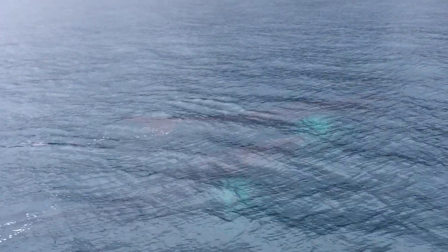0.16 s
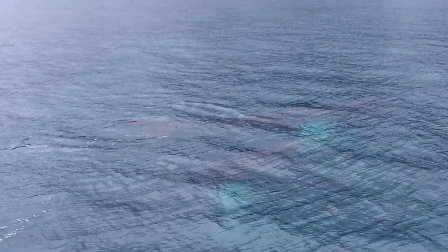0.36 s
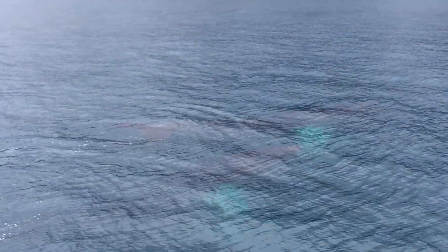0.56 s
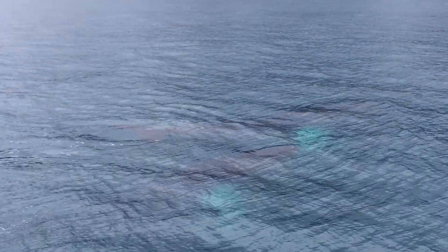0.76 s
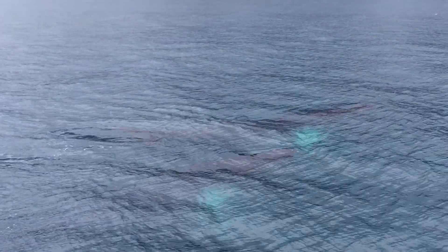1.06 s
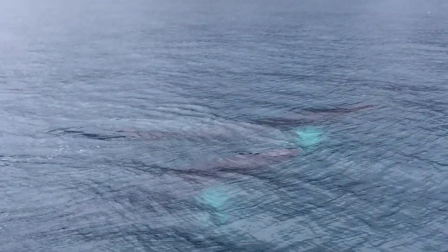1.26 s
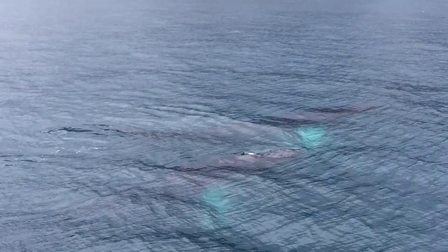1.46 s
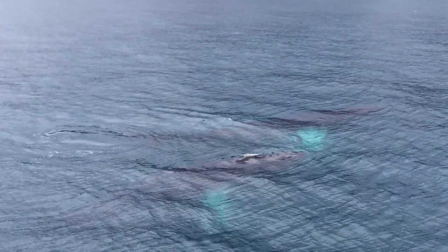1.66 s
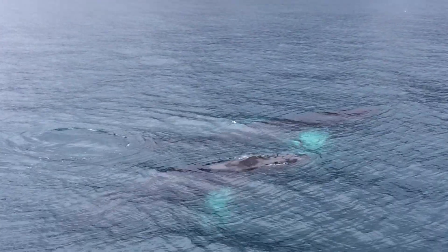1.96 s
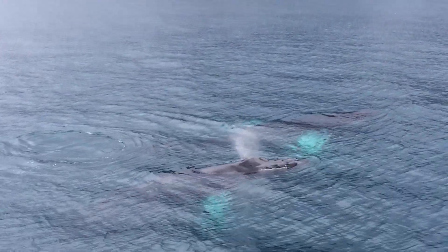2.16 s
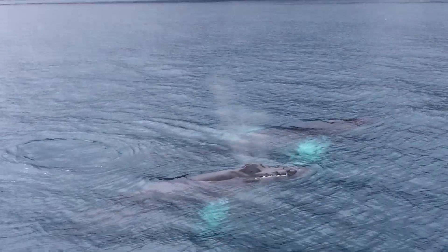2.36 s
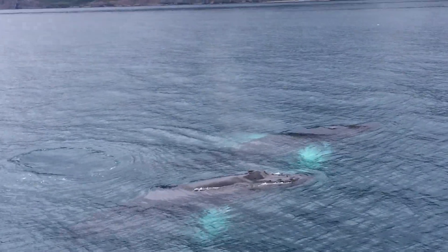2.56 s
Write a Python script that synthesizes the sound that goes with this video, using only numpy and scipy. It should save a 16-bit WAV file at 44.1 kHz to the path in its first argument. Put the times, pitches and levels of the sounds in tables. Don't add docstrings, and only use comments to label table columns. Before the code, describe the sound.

On open sea from a boat deck, low engine rumble, wind thumps and dull water slaps come first, then a whale's sharp rushing exhale, noisy and hollow, fades with small gurgles into the hum.

```python
import sys
import numpy as np
from scipy import signal
from scipy.io import wavfile
from scipy.ndimage import uniform_filter1d

SR = 44100
rng = np.random.default_rng(int(sys.argv[2]) if len(sys.argv) > 2 else 0)


def voltage_ratio(decibels):
    exponent = np.asarray(decibels, float) / 20
    return 10 ** exponent


def log_audio(samples):
    frames = np.atleast_2d(samples).T
    limited = np.clip(frames, -1, 1)
    pcm = np.round(limited * 32767).astype(np.int16)
    wavfile.write(sys.argv[1], SR, pcm)


N = 119511

# [t/s, effort level/dB, treble tilt/dB per octave]
BREATH = [
    (2.08, -60.5, 0.2),
    (2.14, -51.5, 1),
    (2.2, -40, 1),
    (2.25, -30.5, 0.7),
    (2.39, -30.5, 0.93),
    (2.44, -31, 0.5),
    (2.53, -35, 0.2),
    (2.6, -35, -1.16),
    (2.71, -40.5, -0.3),
]
# [f/Hz, level/dB per Hz]
JET_SPECTRUM = [(88, -31), (150, -10), (331, -6.5), (884, -1.5), (1070, -7.5), (1330, 0), (1880, -7.5),
                (6830, -16), (15100, -27)]
# [f/Hz, width/Hz, boost level/dB, change as the blowhole narrows/dB]
NOSTRIL_RESONANCES = [(676, 170, 4.5, -0.5), (876, 70, 6.5, -3.5), (1373, 280, 5.5, -10),
                      (2240, 110, 5.5, -1), (3500, 450, 4.5, -4), (4530, 310, 6.5, -7),
                      (7100, 1500, 4.5, -1.5)]
# [t/s, level/dB, f/Hz]
BLOWHOLE_GURGLES = [
    (2.43, -32, 643),
    (2.46, -36, 720),
    (2.52, -34, 670),
    (2.6, -46.5, 790),
    (2.65, -38.5, 595),
    (2.68, -40, 610),
]
# [t/s, level/dB]
ENGINE_HUM = [(0, -28.5), (.12, -29), (.15, -42), (.2, -27), (.45, -32), (.52, -25), (.63, -29.5),
              (.71, -21), (.82, -25.5), (.88, -23.5), (1.05, -26.5), (1.11, -22.5), (1.21, -28),
              (1.35, -25.5), (2.1, -25.5), (2.41, -24.5), (2.57, -22.5), (2.71, -23.5)]
# [f/multiple of firing rate, level/dB]
ENGINE_ORDERS = [(.5, -45), (3.5, -55)]
# [f/Hz, width/Hz, level/dB]
HULL_RESONANCES = [(483.7, 17.7, -56), (562.6, 29, -75.5), (642, 10, -65), (903, 20, -63.5),
                   (1073, 220, -60), (1298, 50, -67.5), (1814, 160, -68.5), (3370, 180, -67)]
# [f/Hz, level/dB per Hz]
WASH_SPECTRUM = [(30, -9.5), (200, -11), (300, -20.5), (700, -30.5), (1900, -39.5), (2500, -46),
                 (5000, -51), (15100, -67.5)]
# [t/s, level/dB]
WASH_AND_HULL_LEVEL = [(0, -2), (.3, 1), (.7, -1), (.93, -1), (1.0, -3.5), (1.16, -3.5), (1.22, -2), (1.6, -0.5),
                       (2.0, 0.5), (2.71, 0.5)]
# [t/s, level/dB, f/Hz, width/Hz, decay by 60 dB/s]
HULL_KNOCKS = [(.001, -26, 435, 405, 0.13), (.128, -21, 396, 400, 0.084), (.132, -29, 880, 300, 0.046),
               (.234, -29.5, 580, 400, 0.041), (.4, -32, 200, 120, 0.11), (.525, -37, 500, 600, .12),
               (.714, -51, 840, 300, 0.08), (.813, -52, 5900, 7000, .015), (.813, -52.5, 1900, 900, 0.042),
               (.860, -44, 2430, 2530, 0.056), (.864, -42, 720, 300, 0.18), (.862, -56, 3550, 2960, 0.73),
               (1.82, -59.5, 7100, 5000, 0.01), (2.089, -57, 5900, 5000, 0.065),
               (2.164, -49, 1550, 400, .3), (.12, -25.5, 244, 109, 0.24), (.132, -27, 590, 200, 0.084),
               (1.204, -33.5, 190, 59.6, 0.36), (.860, -48, 2310, 250, 0.068)]
# [t/s, level/dB, buffet share level/dB]
GUSTS = [(0, -27, -5), (.03, -32.5, -3), (.1, -31, 1), (.16, -29, -5), (.2, -40.5, 2.5), (.4, -32.5, -7.5),
         (.55, -35, -6.5), (.63, -37, -8), (.71, -23, -26), (.82, -33.5, -23), (.92, -27.5, -25.5),
         (1.06, -35.5, -24.5), (1.13, -31.5, -27.5), (1.24, -32.5, -11.5), (1.4, -46, -10), (2.3, -43, -15),
         (2.43, -36, -19), (2.71, -32.5, -16.5)]
# [f/Hz, width/Hz, boost level/dB]
CASING_RESONANCES = [(42, 12, 4), (118, 12, 12)]


def evened(x):
    return x / np.sqrt(np.mean(x ** 2) + 1e-20)


def smooth_noise(size, passes=1):
    x = rng.standard_normal(N)
    for _ in range(passes):
        x = uniform_filter1d(x, size=size)
    return evened(x)


def read_spectrum(points, hz):
    f, level_db = np.transpose(points)
    return np.interp(np.log(hz + 1), np.log(f + 1), level_db)


def curve(table, t, column=1):
    rows = np.array(table, float)
    return np.interp(t, rows[:, 0], rows[:, column])


def peak(hz, centre, width):
    return 1 / (1 + (2 * (hz - centre) / width) ** 2)


def time_and_frequency(size):
    frames = np.arange(4 * N // size + 5) * size / 4 / SR
    return frames[:, None], np.fft.rfftfreq(size, 1 / SR)[None]


def noise(field_db, patchy_db, flicker_db):
    real, imaginary, c = rng.standard_normal((3,) + field_db.shape)
    patches = evened(uniform_filter1d(uniform_filter1d(c, size=6, axis=0), size=5, axis=1))
    flicker = evened(uniform_filter1d(rng.standard_normal((len(c), 1)), size=3, axis=0))
    level_db = field_db + patchy_db * patches + flicker_db * flicker
    z = (real + 1j * imaginary) * voltage_ratio(level_db)
    window = 2 * field_db.shape[1] - 4
    return signal.istft(z.T, nperseg=window, noverlap=3 * window // 4)[1][:N]


def resonate(x, hz, width):
    turn = np.exp(2j * np.pi * hz * np.arange(len(x)) / SR)
    r = np.exp(-np.pi * width / SR)
    return 2 * (turn * signal.lfilter([1 - r], [1, -r], x / turn)).real


def ringing_band(count, hz, width):
    f = np.fft.rfftfreq(count, 1 / SR)
    skirt = 1 + abs(2 * (f - hz) / width) ** 2.7
    return evened(np.fft.irfft(np.fft.rfft(rng.standard_normal(count)) / skirt))


def whale_blow():
    close_s, closing_s, opening_s = 2.4, 0.03, 0.012
    frames, hz = time_and_frequency(size=512)
    shut = np.clip((frames - close_s) / closing_s, 0, 1)
    rings = sum((db + change_db * shut) * peak(hz, f, width)
                for f, width, db, change_db in NOSTRIL_RESONANCES)
    tilt = curve(BREATH, frames, column=2) * np.log2(hz / 1500 + 0.069)
    jet = evened(noise(read_spectrum(JET_SPECTRUM, hz) + rings + tilt, patchy_db=1.5, flicker_db=0))
    t = np.arange(N) / SR
    opening = np.clip((t - BREATH[0][0]) / opening_s, 0, 1)
    return jet * voltage_ratio(curve(BREATH, t)) * opening


def blowhole_gurgles():
    gurgle_s, width_hz = 0.03, 260
    out, t = np.zeros(N + SR), np.arange(SR // 2) / SR
    swell = np.sin(np.pi * np.minimum(t / gurgle_s, 1))
    for start, db, hz in BLOWHOLE_GURGLES:
        i = round(start * SR)
        out[i:i + len(t)] += voltage_ratio(db) * ringing_band(len(t), hz, width_hz) * swell
    return out[:N]


def hull_rattle(turns):
    throb = 1 + 0.21 * np.cos(np.pi * turns)
    rattle = voltage_ratio(1.2 * smooth_noise(700))
    drive = rng.standard_normal(N) * throb * rattle
    return sum(voltage_ratio(db) * evened(resonate(resonate(drive, hz, width), hz, width))
               for hz, width, db in HULL_RESONANCES)


def wash():
    frames, hz = time_and_frequency(size=1024)
    field_db = read_spectrum(WASH_SPECTRUM, hz) + 0 * frames
    return voltage_ratio(-39.5) * evened(noise(field_db, patchy_db=-1.0, flicker_db=-1.0))


def boat():
    firing_hz = 75.45
    t = np.arange(N) / SR
    turns = firing_hz * t
    hum = np.sqrt(2) * voltage_ratio(curve(ENGINE_HUM, t)) * np.sin(2 * np.pi * turns)
    for order, db in ENGINE_ORDERS:
        hum += np.sqrt(2) * voltage_ratio(db) * np.sin(2 * np.pi * (order * turns + rng.random()))
    return hum + voltage_ratio(curve(WASH_AND_HULL_LEVEL, t)) * (hull_rattle(turns) + wash())


def water_on_hull():
    rise_cycles = 4.9
    out, t = np.zeros(N + SR), np.arange(SR // 2) / SR
    for start, db, hz, width, t60 in HULL_KNOCKS:
        rise = np.sin(np.pi / 2 * np.minimum(t * hz / rise_cycles, 1)) ** 2
        i = round(start * SR)
        out[i:i + len(t)] += ringing_band(len(t), hz, width) * rise * voltage_ratio(db - 60 * t / t60)
    return out[:N]


def wind():
    low_hz, top_hz, buffet_hz, buffet_slope, lumpy_db = 30, 126.6, 313, 2.76, 3.5
    frames, hz = time_and_frequency(size=4096)
    casing_db = sum(db * peak(hz, f, width) for f, width, db in CASING_RESONANCES)
    low = voltage_ratio(2 * casing_db) / (1 + (hz / top_hz) ** 16)
    buffet = voltage_ratio(2 * curve(GUSTS, frames, column=2)) / (1 + (hz / buffet_hz) ** (2 * buffet_slope))
    power = (low + buffet) / (1 + (low_hz / (hz + 1)) ** 4)
    shape_db = 10 * np.log10(power / power.sum(axis=1)[:, None])
    level_db = curve(GUSTS, np.arange(N) / SR) + lumpy_db * smooth_noise(500, passes=2)
    return voltage_ratio(level_db) * evened(noise(shape_db, patchy_db=-2.05, flicker_db=0.92))


def scene():
    return (whale_blow() + blowhole_gurgles() + boat() + water_on_hull() + wind())[None]


def top_cut(x):
    return signal.sosfilt(signal.butter(12, 15210, fs=SR, output="sos"), x)


def record(dry):
    low_cut = signal.butter(4, 32.5, "high", fs=SR, output="sos")
    finished = signal.sosfilt(low_cut, dry)
    return top_cut(finished)


dry = scene()
out = record(dry)
log_audio(out)
```